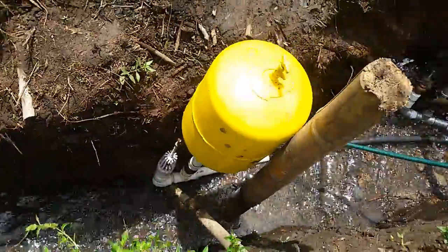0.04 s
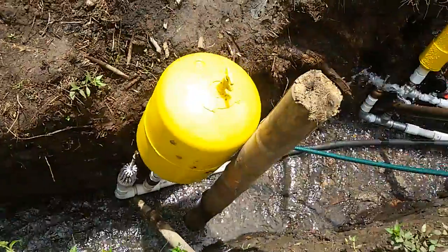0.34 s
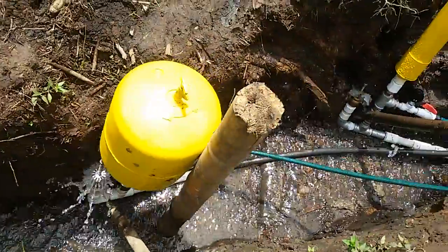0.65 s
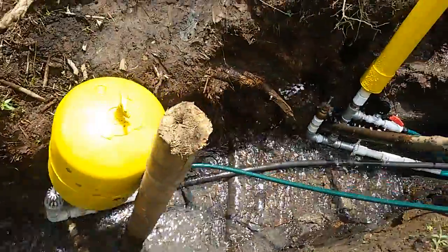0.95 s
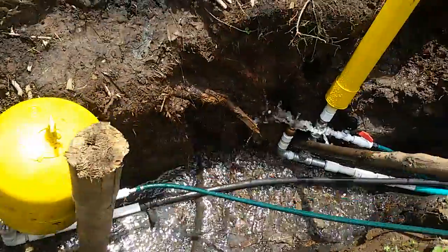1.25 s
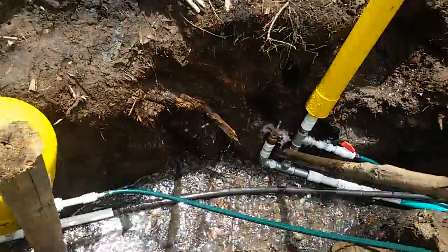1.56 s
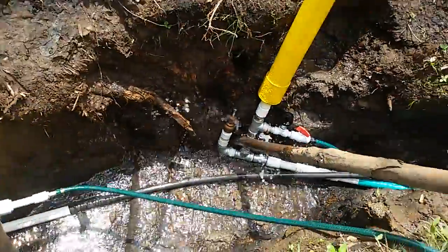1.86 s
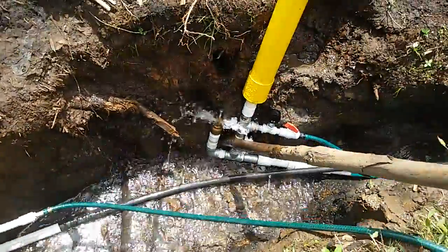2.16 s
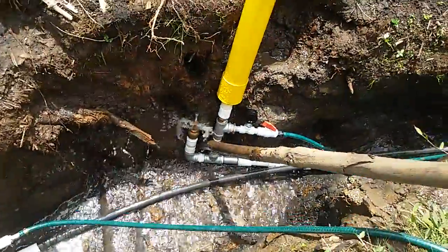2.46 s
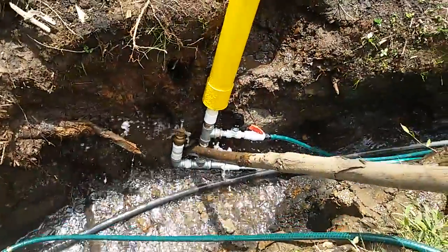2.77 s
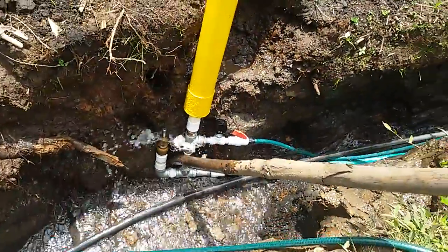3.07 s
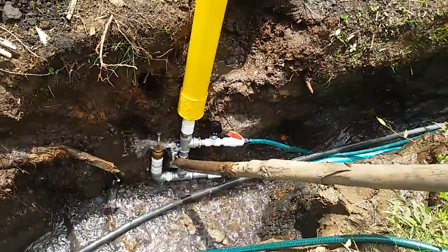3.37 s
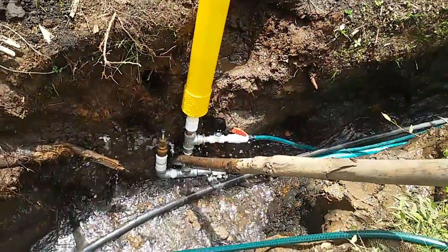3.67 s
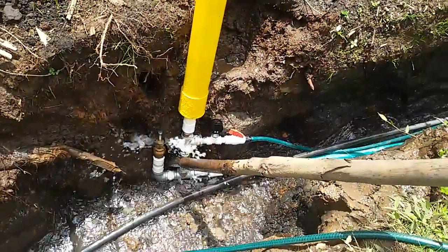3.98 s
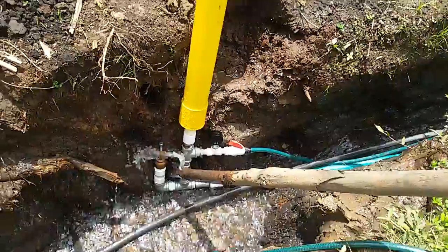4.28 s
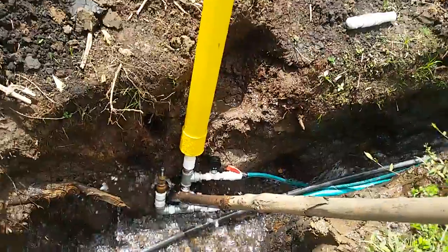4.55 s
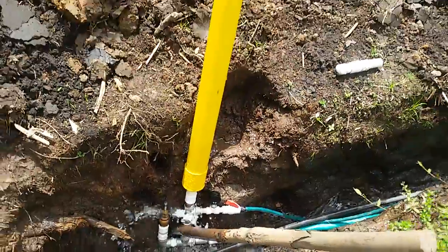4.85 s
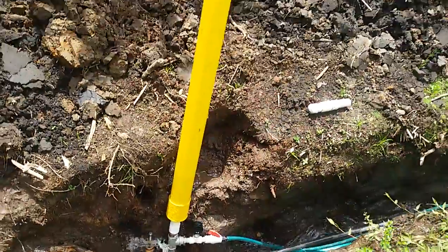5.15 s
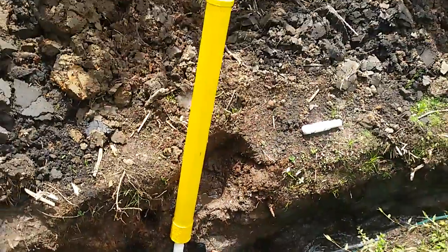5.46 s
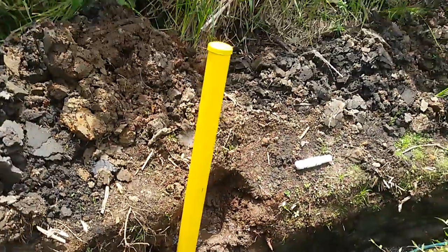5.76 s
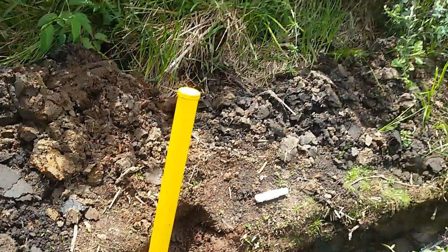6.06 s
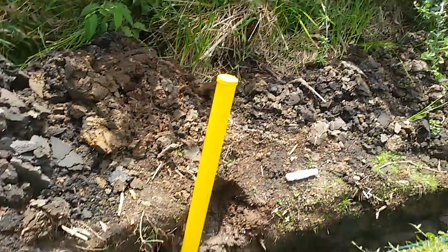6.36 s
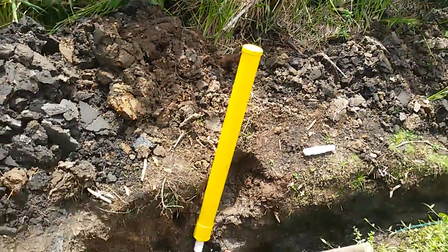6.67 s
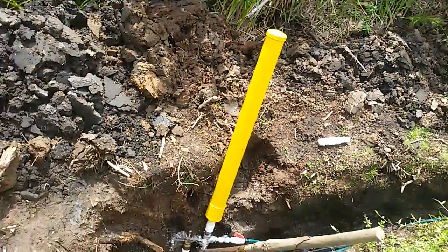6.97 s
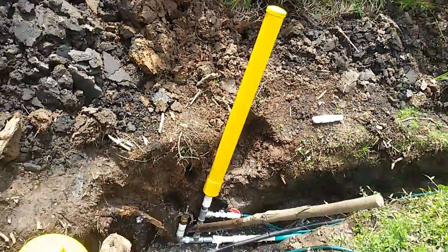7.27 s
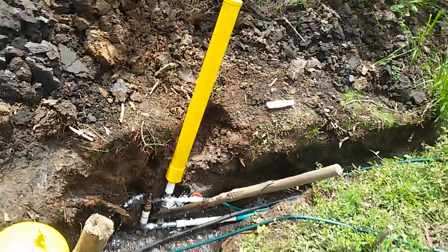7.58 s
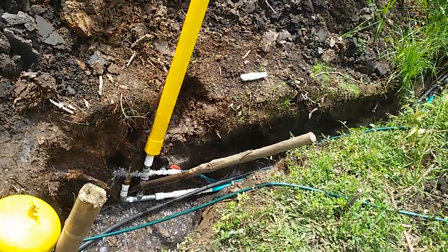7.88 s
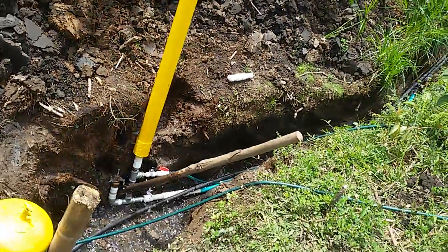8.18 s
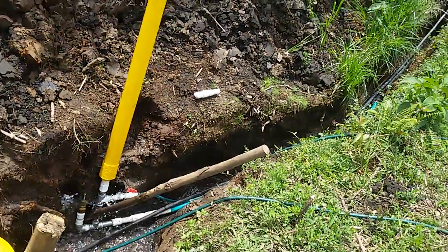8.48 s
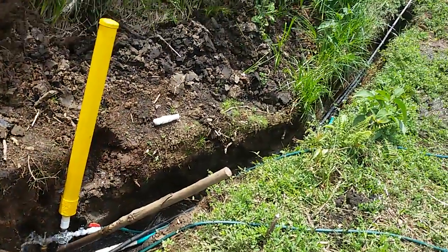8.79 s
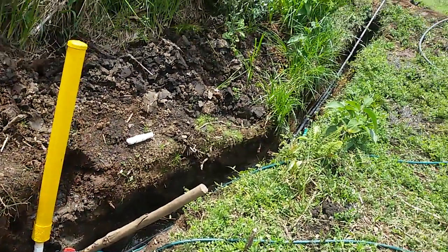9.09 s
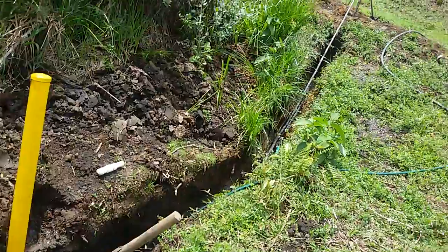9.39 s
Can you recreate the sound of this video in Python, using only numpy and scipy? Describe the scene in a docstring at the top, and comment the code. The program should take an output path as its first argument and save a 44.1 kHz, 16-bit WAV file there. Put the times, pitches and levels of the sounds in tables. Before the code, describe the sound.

A pump valve slams and clacks about twice a second, with slower wet pops and water spattering onto mud.

```python
"""Two water ram pumps work in a muddy trench, heard by someone walking along the bank.
The quick pump's brass waste valve slams shut, water hammer excites the modes of its drive pipe, and
some 80 ms later the valve clacks open. The slow pump clicks and pops about once a second.
Waste water gurgles and patters into the mud, sounding by impact and by the resonance of trapped
bubbles, while eddies of wind nudge the microphone."""
import sys
import numpy as np
from scipy import signal
from scipy.fft import rfft, irfft
from scipy.io import wavfile
from scipy.ndimage import uniform_filter1d

SR = 44100
rng = np.random.default_rng(int(sys.argv[2]) if len(sys.argv) > 2 else 0)


def bounce(signal):
    """Save signal as a 16-bit WAV file at the path given by the first command-line argument."""
    frames = np.transpose(np.atleast_2d(signal))
    limited = np.clip(frames, -1, 1)
    pcm = np.round(limited * 32767).astype(np.int16)
    wavfile.write(sys.argv[1], SR, pcm)


N = 420273
TIME = np.arange(N) / SR
HIT = np.arange(8192) / SR  # time within one blow


def undb(db):
    """Decibels express an amplitude ratio on a logarithmic scale."""
    return 10 ** (np.asarray(db) / 20)


def level(x, db):
    """The level of a steady sound is its rms, set here to db."""
    return x * undb(db) / np.sqrt(np.mean(x ** 2))


def blow(x, db):
    """The strength of a transient is its energy, set here to that of 10 ms of steady sound at db."""
    return x * undb(db) / np.sqrt(np.sum(x ** 2) / (SR / 100))


def add(out, s, x):
    """Superposition: x adds to out from time s."""
    i = max(int(s * SR), 0)
    out[i:i + len(x)] += x[:max(len(out) - i, 0)]


def onset(rise_s):
    """Water cushions a contact, so its force builds up over rise_s."""
    return np.minimum(HIT / rise_s, 1) ** 2


def fade(t60, start=0):
    """Damping gives exponential decay: 60 dB in t60 seconds, from start."""
    return (HIT >= start) * np.exp(-np.log(1000) * np.abs(HIT - start) / t60)


def swell(t, centre_s, width_s):
    """A Gaussian pulse rises smoothly to 1 and falls again."""
    return np.exp(-((t - centre_s) / width_s) ** 2)


def noise(envelope):
    """An envelope modulates the amplitude of white noise."""
    return envelope * rng.standard_normal(len(envelope))


def wander(rate):
    """Slow fluctuation: ramps join random values drawn rate times a second."""
    hold = int(SR / rate)
    return uniform_filter1d(np.repeat(rng.standard_normal(N // hold + 1), hold), hold)[:N]


def colour(x, spectrum):
    """A minimum-phase filter, built by folding the cepstrum, imposes a spectrum of (Hz, dB) points."""
    size = 2048
    hz, db = np.transpose(spectrum)
    bin_hz = np.arange(size // 2 + 1) * SR / size
    gain = undb(np.interp(np.log(bin_hz + 1), np.log(hz), db))
    cepstrum = irfft(np.log(gain))
    cepstrum[1:size // 2] *= 2
    cepstrum[size // 2 + 1:] = 0
    return signal.fftconvolve(x, irfft(np.exp(rfft(cepstrum))))[:len(x)]


def resonate(x, modes):
    """Forced vibration: x drives parallel modes (Hz, bandwidth in Hz, dB) of alternating sign."""
    return sum((-1) ** k * undb(db) * signal.lfilter(*signal.iirpeak(hz, hz / width, SR), x)
               for k, (hz, width, db) in enumerate(modes))


def damped_sine(hz, cycles, glide, t=HIT):
    """A damped oscillator loses 60 dB over so many cycles while its pitch shifts by the share glide."""
    age = np.minimum(t * hz / cycles, 2)
    return np.sin(2 * np.pi * hz * t * (1 + glide * age / 2)) * np.exp(-np.log(1000) * age)


def patter(rate, spread_db, smear_s):
    """Shot noise: random impacts of unequal size, each with a short fizzing tail."""
    sizes = undb(spread_db * np.minimum(rng.exponential(size=N), 5))
    impacts = sizes * (rng.random(N) < rate / SR)
    power = signal.lfilter([1], [1, -np.exp(-2 / (smear_s * SR))], impacts ** 2)
    return level(noise(np.sqrt(power)), 0)


def bubbles(count, low_hz, high_hz, cycles, spread_db):
    """Bubbles of random size resonate, each rising in pitch as it nears the surface."""
    out = np.zeros(N)
    for when, pitch, life, size in rng.random((count, 4)):
        hz = low_hz * (high_hz / low_hz) ** pitch
        turns = cycles * (.5 + life)
        db = -spread_db * np.log(size + np.exp(-4))
        ring = damped_sine(hz, turns, glide=.15, t=HIT[:int(SR * turns / hz)])
        add(out, when * N / SR, undb(db) * ring)
    return level(out, 0)


# The listener's walk. Each row: time in seconds, distance from the pumps in metres.
LISTENER_PATH = [(0, 1.11), (1.5, 1.01), (2.7, 0.99), (4.8, 0.94), (5.8, 1.165), (6.7, 1.46), (7.7, 1.44),
                 (8.2, 1.24), (8.7, 1.82), (9.0, 1.35), (9.5, 1.32)]
def distance_db(s):
    """Spherical spreading: pressure falls inversely with distance, here in dB against 1 m at time s."""
    return -20 * np.log10(np.interp(s, *np.transpose(LISTENER_PATH)))


def since(events, period_s):
    """Position in a cycle: seconds since the latest event, counting one a period before the first."""
    starts = np.array([events[0][0] - period_s] + [row[0] for row in events])
    return TIME - starts[np.maximum(np.searchsorted(starts, TIME) - 1, 0)]


def flow(db, distance_power, landing_db, build_db, lull_db, shower_db=0):
    """Amplitude modulation: the gain of the falling water follows the cycles of both pumps."""
    slow_period_s, quick_period_s = 1.032, QUICK_STROKES[1][0] - QUICK_STROKES[0][0]
    after_pop, after_slam = since(RECOIL_POPS, slow_period_s), since(QUICK_STROKES, quick_period_s)
    landing = landing_db * swell(after_pop, .12, .21)  # the slow pump's spurt comes down
    build = build_db * after_pop / slow_period_s  # its flow gathers again
    lull = lull_db * swell(after_slam, .14, .035)
    shower = shower_db * swell(TIME, 5.72, .12)  # one spurt scatters more widely
    flutter = 1.7 * wander(45) + .8 * wander(8)
    return undb(db + distance_power * distance_db(TIME) + landing + build - lull + shower + flutter)


# Spectrum of running water. Each row: frequency in Hz, gain in dB.
GURGLE_SPECTRUM = [(60, -17.5), (200, -4.5), (420, -4.5), (680, -0.5), (1000, 1), (1500, 2.5), (2200, -16),
                   (4000, -44)]
def gurgle():
    """Waste water running along the trench traps large bubbles, which resonate at low pitch."""
    gain = flow(-45, distance_power=1.24, landing_db=7, build_db=6.5, lull_db=2)
    wash = level(colour(patter(rate=700, spread_db=4.5, smear_s=.014), GURGLE_SPECTRUM), -8.5)
    ringing = bubbles(count=900, low_hz=549, high_hz=1866, cycles=47, spread_db=3)
    return gain * (wash + undb(-9.5) * ringing)


# Spectrum of water striking mud. Each row: frequency in Hz, gain in dB.
SPLASH_SPECTRUM = [(700, -6), (1400, -41), (1900, 12.5), (2400, 11), (3000, 15.5), (4500, 10), (6500, 8),
                   (9000, 1.5)]
def splash():
    """Water raining back on mud and pipes radiates by impact and by the resonance of small bubbles."""
    gain = flow(-43.5, distance_power=1, landing_db=5, build_db=4, lull_db=2.5, shower_db=5)
    impacts = level(colour(patter(rate=3100, spread_db=6, smear_s=.011), SPLASH_SPECTRUM), -5)
    ringing = bubbles(count=4200, low_hz=1586, high_hz=6070, cycles=91, spread_db=4)
    return gain * (impacts + undb(-8) * ringing)


# Spectrum of fine droplets landing. Each row: frequency in Hz, gain in dB.
SPRAY_SPECTRUM = [(3500, -34), (6000, 3.5), (7500, 5), (9000, 6.5), (11200, 3), (12800, 1), (14500, -52)]
def spray():
    """The briefest impacts and the smallest bubbles radiate the highest frequencies."""
    gain = flow(-57.5, distance_power=.8, landing_db=5.5, build_db=6, lull_db=4, shower_db=3)
    impacts = level(colour(patter(rate=2700, spread_db=1.5, smear_s=.00094), SPRAY_SPECTRUM), 0)
    fizz = bubbles(count=2000, low_hz=5960, high_hz=11960, cycles=160, spread_db=4.5)
    return gain * (impacts + undb(-4) * fizz)


# Gusts. Each row: start in seconds, end in seconds, level in dB about which the gust fluctuates.
WIND_GUSTS = [(1.155, 1.512, -45), (1.742, 1.915, -42.5), (3.57, 3.637, -46), (4.625, 5.2, -39.5)]
# The hardest buffets within them. Each row: start in seconds, relative level in dB, pitch in Hz.
WIND_BUFFETS = [(1.257, -31.5, 94.2), (1.458, -31, 87), (4.692, -26, 86), (4.737, -30, 139),
                (4.764, -29, 101), (4.785, -30, 145), (4.937, -21, 113)]
def wind():
    """Turbulence: eddies press on the microphone port as a low rumble with single thumps."""
    edge_s, calm_db = .052, -67.5
    spectrum = [(20, -14), (40, -6), (62, 1.5), (95, -2.5), (150, -14.5), (300, -36), (800, -77)]
    eddies = level(colour(noise(np.ones(N)), spectrum), 0)
    gusts = sum(undb(db) * np.interp(TIME, [start - edge_s, start, end, end + edge_s], [0, 1, 1, 0])
                for start, end, db in WIND_GUSTS)
    out = eddies * (undb(calm_db) + gusts) * undb(4 * wander(25))
    for s, db, hz in WIND_BUFFETS:
        add(out, s, blow(damped_sine(hz, cycles=5.5, glide=-.11) * onset(.0066), db + 1))
    return out


# The quick pump's strokes. Each row: time of closure in seconds, then for the reopening the clack's
# relative level in dB, the metal tick's relative level in dB and the hollow ring's pitch in Hz.
QUICK_STROKES = [(0.049, -17.5, -35, 972), (0.498, -22.5, -34, 976), (0.945, -22.5, -31.5, 960),
                 (1.392, -19.5, -30, 1130), (1.839, -18, -28, 1200), (2.285, -19, -30, 966),
                 (2.734, -22, -24, 990), (3.179, -19.5, -31, 1160), (3.627, -18.5, -30, 1170),
                 (4.073, -20.5, -31, 1190), (4.519, -14, -33, 1185), (4.966, -20, -41, 1300),
                 (5.413, -21.5, -42, 1280), (5.861, -21, -35, 1280), (6.31, -20, -33, 960),
                 (6.756, -20, -36, 930), (7.204, -19, -31, 935), (7.649, -22, -35, 960),
                 (8.096, -20.5, -34, 1050), (8.540, -18, -45, 1070), (8.990, -25, -36, 1260),
                 (9.435, -20, -39, 1010)]
# Spectra of the slam's crack and of a hard, bright contact. Each row: frequency in Hz, gain in dB.
CRACK_SPECTRUM = [(150, 1.5), (400, -1), (800, 3), (1020, 4.5), (1230, 9), (1700, 1), (2500, -3), (3400, 0),
                  (5000, -10.5), (9000, -20)]
SNAP_SPECTRUM = [(1500, -39), (4200, 7.5), (5600, 2), (7300, 7.5), (8500, 3), (10800, 3), (12500, -2.5),
                 (14000, -2.5)]
def valve_slams():
    """A brief impact has a broad spectrum: the quick pump's valve shuts with a crack and a snap."""
    out = np.zeros(N)
    for s, *_ in QUICK_STROKES:
        slam_db = -14 + distance_db(s)
        crack = colour(noise(onset(.0011) * (fade(.057) + .05 * fade(.13))), CRACK_SPECTRUM)
        snap = colour(noise(onset(.00054) * (fade(.035) + .088 * fade(.078))), SNAP_SPECTRUM)
        add(out, s - .001, blow(crack, slam_db - 13) + blow(snap, slam_db - 21.5))
    return out


# Modes of the drive pipe's water column and wall.
# Each row: frequency in Hz, relative level in dB, time to decay by 60 dB in seconds.
PIPE_MODES = [(62, -15, 0.24), (118.7, -6, 0.19), (193.6, -9, 0.34), (260.6, -7, 0.33), (301.2, -5.5, 0.38),
              (337.7, -3.5, 0.37), (404.2, -2.5, 0.34), (494, -3.5, 0.13), (540, 0.5, 0.091),
              (694, -6.5, 0.21)]
# The part of the ring that carries best along the walk. Each row: time in seconds, frequency in Hz.
RING_CENTRE = [(0, 484), (1.4, 457), (1.85, 405), (5.45, 410), (5.85, 550), (6.3, 556), (6.75, 307),
               (9.5, 333)]
def water_hammer():
    """Water hammer: the arrested flow sends a pressure surge that rings the drive pipe's modes."""
    out = np.zeros(N)
    surge_s = .034  # the ring drops once the surge is spent
    surge = np.interp(HIT, [surge_s - .003, surge_s + .004], [1, .33])
    for s, *_ in QUICK_STROKES:
        pipe_db = -25 + 1.23 * distance_db(s)
        centre_hz = np.interp(s, *np.transpose(RING_CENTRE))
        scatter = rng.standard_normal((len(PIPE_MODES), 2)) * [1.5, .009]
        ring = 0
        for k, ((hz, mode_db, t60), (stray_db, detune)) in enumerate(zip(PIPE_MODES, scatter)):
            favour_db = 5 * np.exp(-(np.log2(hz / centre_hz) / .24) ** 2)
            mode = fade(t60) * np.sin(2 * np.pi * hz * (1 + detune) * HIT)
            ring += (-1) ** k * undb(mode_db + favour_db + stray_db) * mode
        add(out, s - .001, blow(ring * surge, pipe_db - .5))
        churn = noise(onset(.016) * fade(.44))  # water churns in the pipe after the blow
        churn = resonate(churn, [(123, 160, -2), (247, 104, 1.5), (450, 210, -3)])
        add(out, s, blow(churn, pipe_db - 9))
    return out


def bounces(first_s, keep, t60):
    """Inelastic collision: the force of a part that rebounds three times in shrinking hops."""
    landings = np.cumsum(first_s * .78 ** np.arange(3) * rng.uniform(.92, 1.08, 3))
    return fade(t60) + sum(keep * .52 ** k * rng.uniform(.57, 1.6) * fade(t60 * .95, s)
                           for k, s in enumerate(landings))


# Modes of the valve body, and of its brass stem and spring.
# Each row: frequency in Hz, bandwidth in Hz, relative level in dB.
BODY_MODES = [(730, 190, 3), (996, 67, 6.5), (1204, 41, 8), (1500, 290, 0), (2010, 370, -1),
              (3590, 740, -5.5)]
STEM_MODES = [(6336, 79, 6), (7320, 260, 4.5), (7230, 230, 8.5), (11150, 830, -4.5), (13760, 230, -1)]
def valve_clacks():
    """Impact excites modes: the valve falls open onto its stop, bounces and sets its stem chattering."""
    out = np.zeros(N)
    closed_for_s, brass_distance_power = .079, .26
    for shut_s, clack_db, tick_db, ring_hz in QUICK_STROKES:
        s, far_db = shut_s + closed_for_s, distance_db(shut_s)
        brass_db = -40.5 + brass_distance_power * far_db
        hops = bounces(first_s=.017, keep=.36, t60=.046)
        contact = onset(.0036) * (hops + .45 * fade(.084))
        hollow_ring = damped_sine(ring_hz, cycles=21, glide=0) * onset(.0018)
        add(out, s, blow(resonate(noise(contact), BODY_MODES), clack_db + far_db - 8))
        add(out, s, blow(hollow_ring, clack_db + far_db - 10.5))
        # the stem lands a little askew, so its modes share the blow differently each time
        scatter = rng.standard_normal((len(STEM_MODES), 2)) * [.004, 3.5]
        stem = [(hz * (1 + detune), width, db + stray_db)
                for (hz, width, db), (detune, stray_db) in zip(STEM_MODES, scatter)]
        add(out, s + .0032, blow(resonate(noise(hops), stem), brass_db + 5.5))
        add(out, s, blow(colour(noise(contact), SNAP_SPECTRUM), brass_db + 3))
        # first touch of metal on metal
        tick = damped_sine(10900, cycles=70, glide=0) + .25 * colour(noise(fade(.006)), SPRAY_SPECTRUM)
        add(out, s + .001, blow(tick, tick_db + far_db - 5.5))
        unseating = resonate(noise(fade(.03)), STEM_MODES[:3])  # the stem ticks as it leaves its seat
        add(out, s - .018, blow(unseating, brass_db + far_db - 9))
    return out


# Lone drops. Each row: start in seconds, relative level in dB.
PIPE_DROPS = [(0.3691, -25), (1.5833, -33), (2.4134, -28.5), (2.632, -27), (2.6445, -29), (3.8048, -28.5)]
def drops():
    """A drop stops abruptly on a hard pipe, so its impact is short and bright."""
    out = np.zeros(N)
    for s, db in PIPE_DROPS:
        add(out, s, blow(colour(noise(fade(.015)), SNAP_SPECTRUM), db - 12))
    return out


# The slow pump's pops. Each row: start in seconds, relative level in dB, pitch in Hz.
RECOIL_POPS = [(0.913, -16.5, 1540), (1.944, -16.5, 1490), (2.973, -14.5, 1570), (4.004, -14.5, 1610),
               (5.042, -18.5, 1570), (6.072, -18.5, 1600), (7.108, -20.5, 1380), (8.139, -19.5, 1520),
               (9.167, -18.5, 1505)]
# Spectrum of a dull, wet click. Each row: frequency in Hz, gain in dB.
CLICK_SPECTRUM = [(150, -8), (600, -7.5), (1300, -1.5), (1900, 1.5), (2800, -10.5), (4500, -17),
                  (7000, -18), (10000, -28), (15000, -95.5)]
def slow_pump():
    """Impact and recoil: the valve shuts with a rough click, then the water rebounds with a pop."""
    out = np.zeros(N)
    seating = onset(.001) * (fade(.035) + .5 * fade(.03, start=.004) + .08 * fade(.12))
    splutter = onset(.002) * (fade(.025) + .25 * fade(.11))
    for s, db, hz in RECOIL_POPS:
        shut_s, click_db = s - .036, -23 + distance_db(s)
        add(out, shut_s, blow(colour(noise(seating), CLICK_SPECTRUM), click_db - 6.5))
        add(out, shut_s, blow(damped_sine(1750, cycles=20, glide=0), click_db - 12))
        pop = damped_sine(hz, cycles=28, glide=.04) + .5 * damped_sine(850, cycles=18, glide=.03)
        add(out, s, blow(pop * onset(.0013), db - 12))
        add(out, s - .001, blow(colour(noise(splutter), CLICK_SPECTRUM), db - 12.5))
    return out


# The largest spurts landing. Each row: start in seconds, relative level in dB.
MUD_SPLATS = [(2.6326, -26), (4.4274, -28.5), (4.7175, -26.5), (4.797, -28), (4.844, -27), (5.3176, -28.5),
              (6.274, -25), (8.278, -29.5), (8.337, -26.5), (9.314, -24.5)]
def splats():
    """Impact noise: spurts slap the mud, and two lesser pieces land after each pop of the slow pump."""
    out = np.zeros(N)
    earliest_s, latest_s = .078, .24
    pieces = [(s + earliest_s + (latest_s - earliest_s) * late, -32 + .32 * distance_db(s) - 5 * weak)
              for s, *_ in RECOIL_POPS for late, weak in rng.random((2, 2))]
    for s, db in MUD_SPLATS + pieces:
        slap = colour(noise(onset(.0012) * fade(.075)), SPLASH_SPECTRUM)
        add(out, s - .001, blow(slap, db - 10.5))
    return out


# The largest gobs of water. Each row: start in seconds, relative level in dB, bubble pitch in Hz.
PUDDLE_PLOPS = [(1.275, -27, 763), (1.732, -19.5, 740), (2.62, -23, 697), (2.714, -21, 1210),
                (3.433, -27.5, 1510), (3.475, -23, 594), (3.854, -23.5, 687), (4.187, -22, 2150),
                (4.267, -25.5, 544), (4.717, -22.5, 725), (4.931, -25, 790), (5.115, -20, 2650),
                (5.999, -24, 610), (6.231, -27, 2710), (6.544, -27.5, 650), (8.764, -31.5, 837)]
def plops():
    """Bubble resonance: each gob strikes the puddle and traps air, which rings like a mass on a spring."""
    out = np.zeros(N)
    low_hz, high_hz = 532, 1146
    lesser_gobs = [(s, -33.5 + distance_db(s), low_hz * (high_hz / low_hz) ** pitch)
                   for s, pitch in rng.random((20, 2)) * [N / SR, 1]]
    for s, db, hz in PUDDLE_PLOPS + lesser_gobs:
        add(out, s, blow(damped_sine(hz, cycles=35, glide=.076) * onset(.0013), db - 11))
        add(out, s, blow(colour(noise(onset(.0035) * fade(.048)), CLICK_SPECTRUM), db - 25))
    return out


def glug():
    """Cavity resonance: an air pocket shrinks as it fills with water, so its pitch climbs unsteadily."""
    start_s, length_s, first_hz, last_hz = 5.172, .068, 300, 880
    fill = np.clip((TIME - start_s) / length_s, 0, 1)
    wobble = wander(200)
    hz = first_hz * (last_hz / first_hz) ** fill * (1 + .08 * wobble)
    envelope = undb(-38 + 1.8 * wobble) * np.sin(np.pi * fill)
    return envelope * np.sin(2 * np.pi * np.cumsum(hz) / SR)


# Sound glancing off the lip of the trench, stronger as the listener steps back.
# Each row: time in seconds, reflected amplitude as a share of the direct sound.
LIP_REFLECTION = [(0, 0.0067), (6.0, 0.013), (7.4, 0.19), (9.5, 0.17)]
def grazing_reflection(direct):
    """Interference: a grazing reflection arrives late and inverted, and hollows the treble."""
    lag_s = .00034
    share = np.interp(TIME, *np.transpose(LIP_REFLECTION))
    return -share * np.interp(TIME - lag_s, TIME, direct)


def scene():
    """Superposition: the sounds of the trench, their reflection and the wind add in one channel."""
    pumps = valve_slams() + water_hammer() + valve_clacks() + slow_pump()
    water = gurgle() + splash() + spray() + drops() + splats() + plops() + glug()
    trench = pumps + water
    return (trench + grazing_reflection(trench) + wind())[None]


def record(dry):
    """Band limiting: the camera cuts the rumble below 46 Hz and the treble above 14450 Hz."""
    dry = signal.sosfilt(signal.butter(4, 46, "high", fs=SR, output="sos"), dry)
    return signal.sosfilt(signal.ellip(8, .2, 70, 14450, fs=SR, output="sos"), dry)


dry = scene()
out = record(dry)
bounce(out)
```